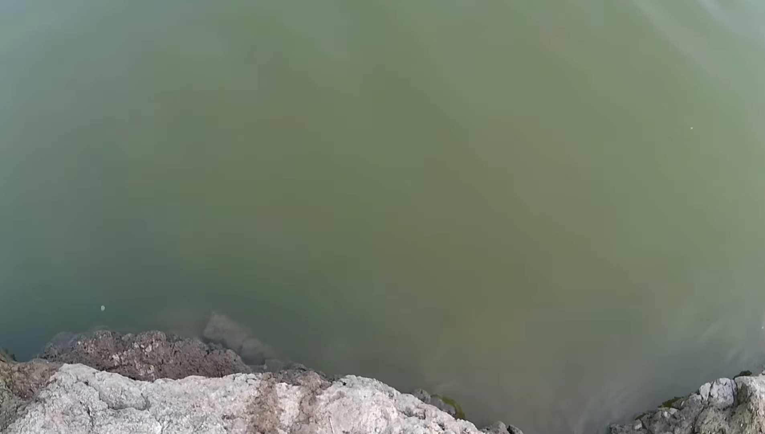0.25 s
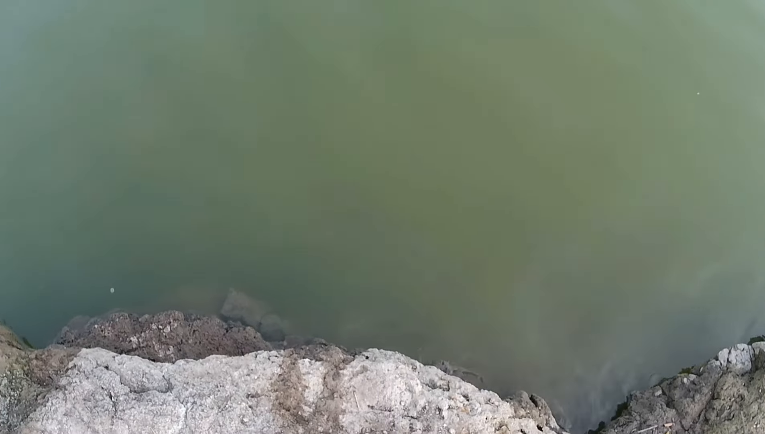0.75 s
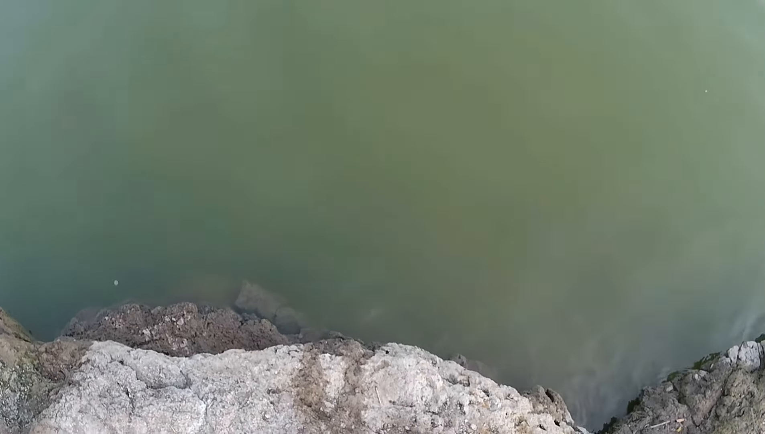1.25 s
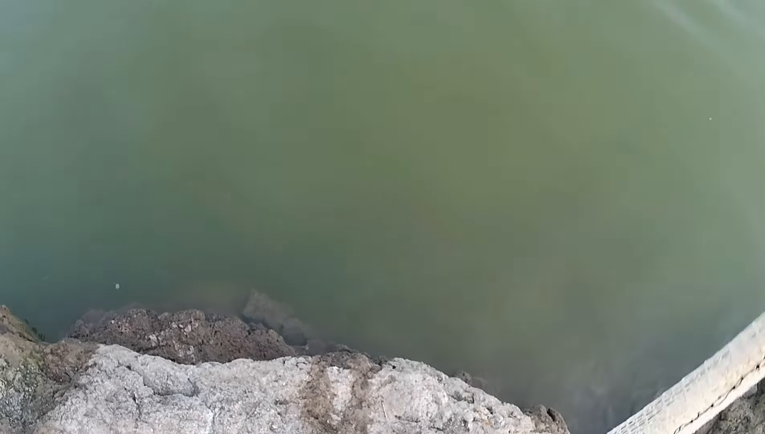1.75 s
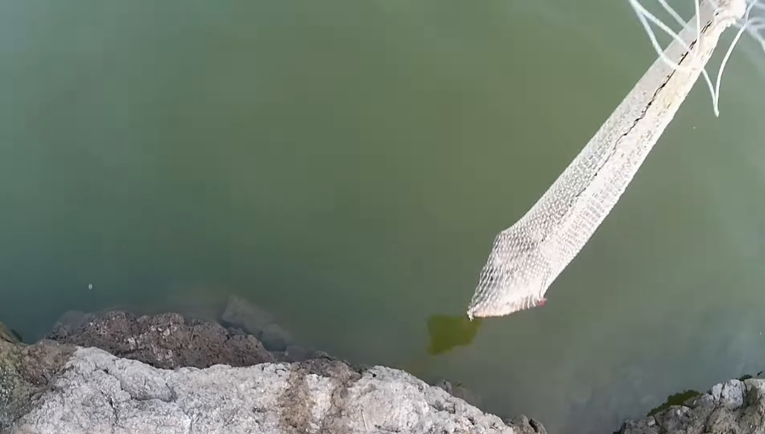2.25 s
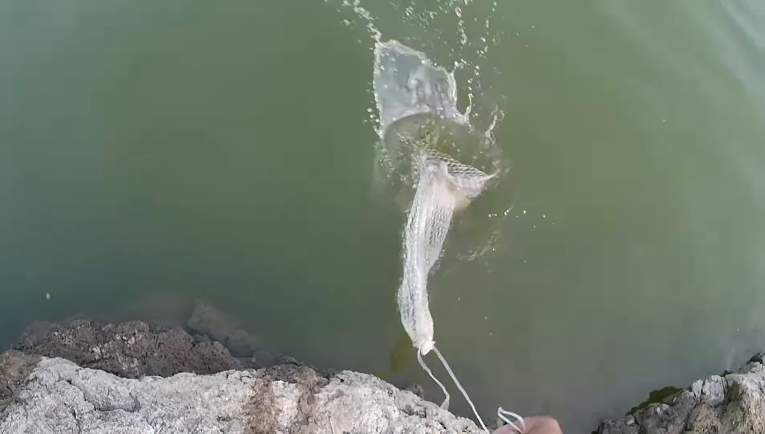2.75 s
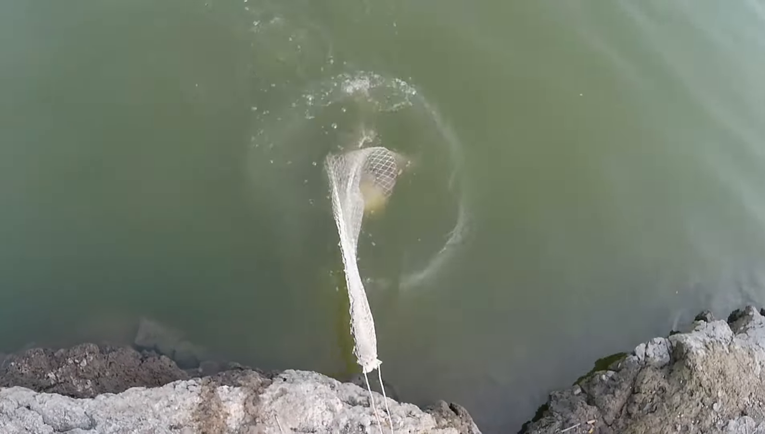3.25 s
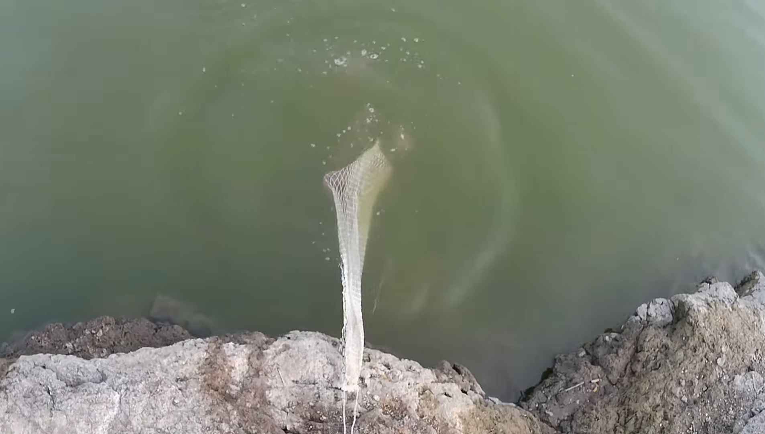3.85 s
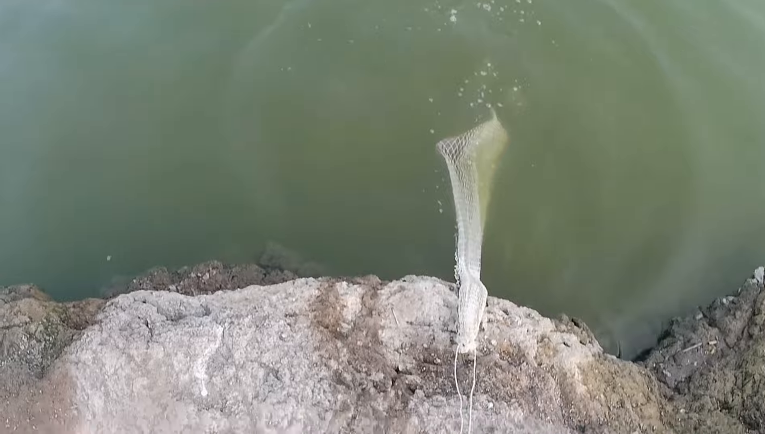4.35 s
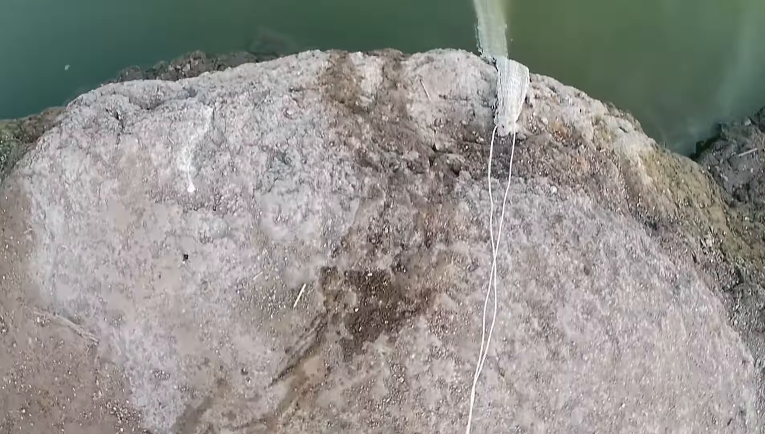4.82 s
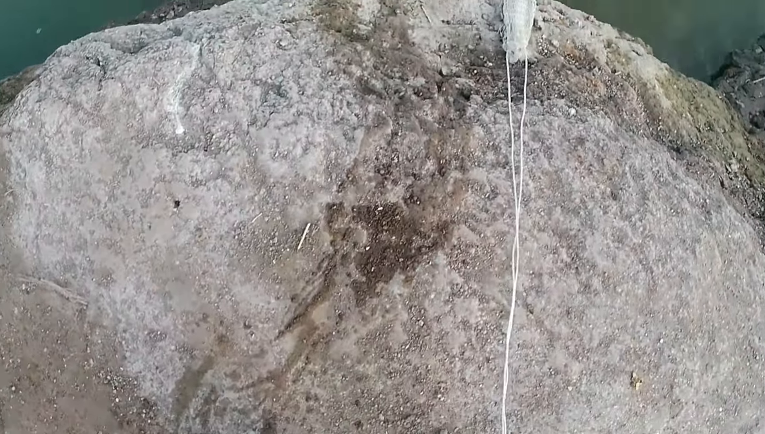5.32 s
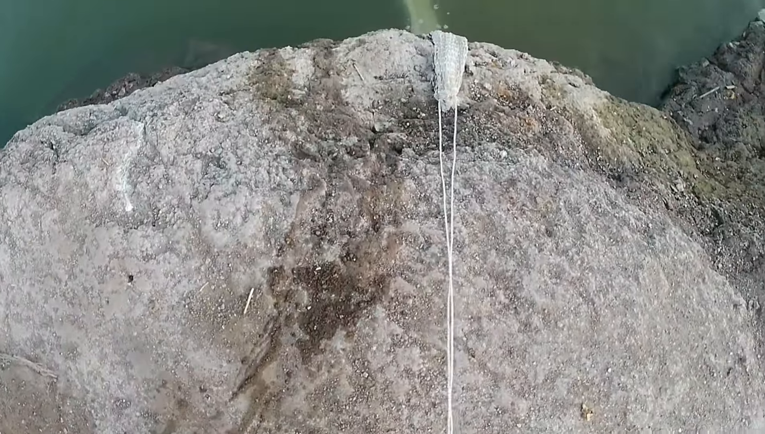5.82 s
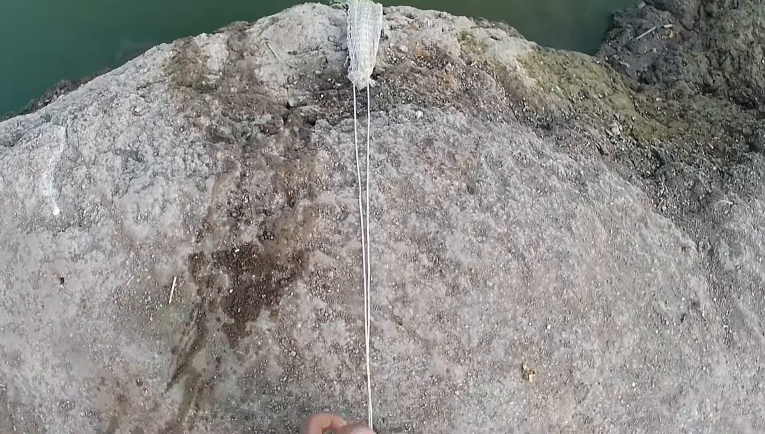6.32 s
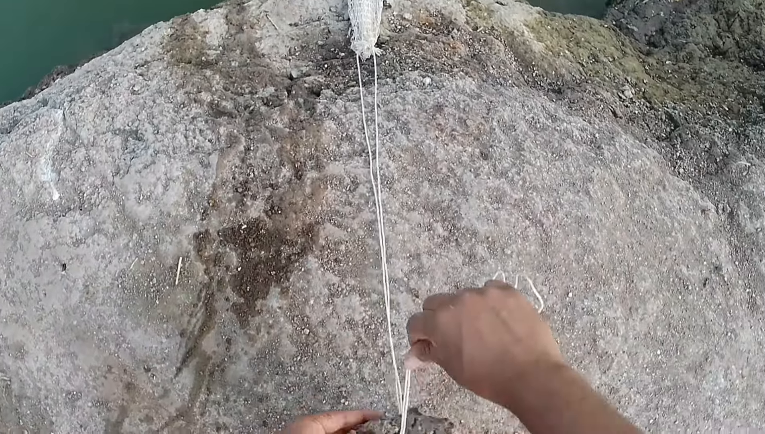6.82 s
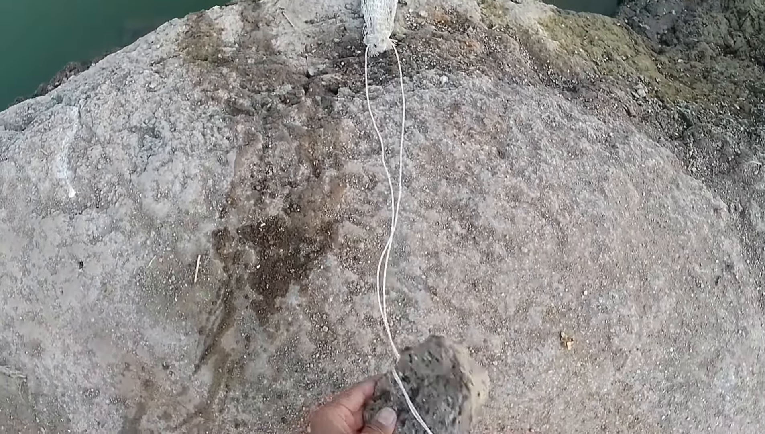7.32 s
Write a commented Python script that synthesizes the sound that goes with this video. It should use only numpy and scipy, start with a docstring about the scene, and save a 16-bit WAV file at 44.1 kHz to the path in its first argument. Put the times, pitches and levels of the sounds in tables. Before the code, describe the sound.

Outdoors on a rock by a pond, gusts buffet the microphone while far birds whistle faintly and the mount ticks. A thrown net lands with a sharp splash, then spatters and gurgles for a moment. Short foot scuffs, a small slosh and more sharp clicks follow. Two dull, close knocks of a stone come last, as the wind and a far roar carry on.

```python
"""On a rock by a pond, a mesh net is thrown and its cord is wound round a stone.
A small camera in a case hears it: wind buffets the microphone over a far roar and far birds whistle.
The camera mount ticks as the head turns, feet scuff, water sloshes, the cord ticks and the stone bumps.
The net slaps the water: spray patters, droplets crack on the surface and trapped air rings as bubbles."""
import sys
import numpy as np
from scipy import signal
from scipy.fft import rfft, irfft
from scipy.io import wavfile
from scipy.ndimage import uniform_filter1d

SR = 44100
rng = np.random.default_rng(int(sys.argv[2]) if len(sys.argv) > 2 else 0)


def file_out(sig):
    """Save sig as 16-bit WAV at sys.argv[1]."""
    # one column per channel
    cols = np.atleast_2d(sig).T
    # limit, then scale
    lim = np.clip(cols, -1, 1)
    pcm = np.round(lim * 32767).astype(np.int16)
    wavfile.write(sys.argv[1], SR, pcm)


N = 333925


def gain_of(db):
    """Turns decibels into a number to multiply a sound by."""
    return 10 ** (np.asarray(db) / 20)


def evened(x):
    """Scales a signal to an average (rms) size of 1."""
    return x / np.sqrt(np.mean(x ** 2) + 1e-20)


def over_time(points):
    """Joins (time, value) points with straight lines across the whole scene."""
    return np.interp(np.arange(N) / SR, *np.transpose(points))


def add(mix, start_s, sound):
    """Mixes a sound in at its start time."""
    part = mix[round(start_s * SR):][:len(sound)]
    part += sound[:len(part)]


def coloured(x, tone):
    """Shapes the lows and highs of x with a tone table; the result has size 1."""
    hz = np.fft.rfftfreq(len(x), 1 / SR)
    tone_hz, tone_db = np.transpose(tone)
    db = np.interp(np.log(hz + 1), np.log(tone_hz + 1), tone_db, left=-90, right=-90)
    return evened(irfft(rfft(x) * gain_of(db), len(x)))


def noise(tone):
    """Steady shaped noise as long as the scene."""
    return coloured(rng.standard_normal(N), tone)


def band(low_hz, high_hz, length, order=4):
    """Up to 0.1 s of noise between two frequencies."""
    edges = signal.butter(order, [low_hz, high_hz], "band", fs=SR, output="sos")
    return evened(signal.sosfilt(edges, rng.standard_normal(SR // 10)))[-length:]


def wobble(samples, length=N):
    """A random drift of about size 1, smoothed over the given number of samples."""
    return evened(uniform_filter1d(uniform_filter1d(rng.standard_normal(N), samples), samples))[:length]


# tone of the microphone's hiss: (frequency [Hz], relative level [dB])
HISS_TONE = [(1470, -10), (2500, -3), (3950, -3.5), (8020, -7), (15000, -10), (16000, -13)]


def hiss():
    """The microphone makes a faint noise of its own."""
    return gain_of(-57.5) * noise(HISS_TONE)


# tone of the background rush: (frequency [Hz], relative level [dB])
RUSH_TONE = [(480, -10.5), (650, -2.5), (980, -18)]
# how the rush grows: (time [s], level [dB])
RUSH_LEVEL = [(4.3, -52), (5.3, -42.5)]


def rush():
    """A narrow band of noise grows louder in the background."""
    return noise(RUSH_TONE) * gain_of(over_time(RUSH_LEVEL))


# far bird calls: (time [s], length [s], four pitches in turn [Hz], level [dB], octave level [dB])
BIRD_CALLS = [(.066, 0.062, 2480, 2450, 2320, 2130, -56, -62),
              (.188, 0.02, 4250, 4450, 4550, 4600, -62, -80),
              (1.34, .052, 3100, 3330, 3180, 3030, -61, -80),
              (1.995, 0.225, 2630, 2510, 2590, 2560, -61, -70),
              (2.33, 0.11, 2600, 2640, 2470, 2310, -57, -75),
              (4.305, 0.205, 2500, 2510, 2500, 2530, -57.5, -85),
              (7.35, 0.021, 3350, 3300, 3280, 3150, -58, -80)]


def bird(length_s, *row):
    """An almost pure whistle with a faint octave above, wavering on its way through the air."""
    *pitches, db, octave_db = row
    t = np.arange(0, length_s, 1 / SR)
    hz = np.interp(t, np.linspace(0, length_s, len(pitches)), pitches)
    phase = 2 * np.pi * np.cumsum(hz * (1 + 0.0093 * wobble(150, len(t)))) / SR
    whistle = np.sqrt(2) * (gain_of(db) * np.sin(phase) + gain_of(octave_db) * np.sin(2 * phase))
    return whistle * gain_of(2.0 * wobble(300, len(t))) * signal.windows.tukey(len(t), .3)


# gusts at the microphone: (time [s], level [dB])
GUSTS = [(0, -25.5), (.65, -30), (1.95, -25), (2.12, -17), (2.4, -23.5), (2.53, -11.5), (2.74, -15),
         (2.82, -21), (3.27, -22.5), (3.4, -15), (3.48, -20.5), (3.62, -15), (3.75, -25.5), (3.98, -12.5),
         (4.38, -26), (6.3, -23), (6.88, -28), (7.57, -22.5)]
# tones of the wind's buffeting and of the far roar: (frequency [Hz], relative level [dB])
BUFFET_TONE = [(4.7, -42), (8.0, -3.5), (49, 2.5), (106, -9), (215, -21.5), (241, -19), (270, -30.5),
               (400, -34.5), (520, -77), (880, -120)]
ROAR_TONE = [(59, -41), (100, -0.5), (216, -6), (249, -4), (304, -7.5), (338, -8), (461, -15), (490, -12.5),
             (755, -19.5), (1400, -31), (4000, -48.5), (5200, -52), (8800, -120)]


def wind():
    """Swirls of air rumble at the microphone opening; a far roar follows the gusts a little."""
    gust_db = over_time(GUSTS)
    buffet = noise(BUFFET_TONE) * gain_of(gust_db + 1.7 * wobble(1500))
    roar = noise(ROAR_TONE) * gain_of(-31 + 0.083 * gust_db + 1.08 * wobble(700))
    return buffet + roar


def jolt(u):
    """A single shove near u = 0: a quick rise and a slower fall."""
    return 0.95 / (np.exp(-np.clip(10.5 * u, -50, 50)) + np.exp(np.minimum(u, 50)))


def cushioned(x, ms):
    """Padding spreads a knock over about ms milliseconds and dulls its highs."""
    cycles_per_ms = np.fft.rfftfreq(len(x), 1000 / SR)
    return irfft(rfft(x) * np.exp(-(cycles_per_ms * ms) ** 3), len(x))


# notes the camera case rings at: (pitch [Hz], relative level [dB], time to fade by 60 dB [s])
CASE_NOTES = [(1030, 2, 0.0024), (1710, -14, 0.016), (2605, -2, 0.0066), (3620, -18, 0.0096),
              (4530, -3, 0.0065), (5220, -8.5, 0.0056), (7300, -36, 0.0041)]


def case_tick(contact_ms, bounce_ms, bounce_share, settle, ring_db, soften):
    """The case is jolted 2 ms in, rings, bounces once more softly and slowly settles."""
    t = np.arange(1500) / SR
    ms = t * 1000
    ring = sum(gain_of(db - 60 * t / fade_s) * np.sin(2 * np.pi * hz * t)
               for hz, db, fade_s in CASE_NOTES)
    out = settle * jolt((ms - 3.5) / 2.0)
    for share, at_ms, span_ms in (1, 2, contact_ms), (bounce_share, 2 + bounce_ms, soften * contact_ms):
        front = jolt((ms - at_ms) / (0.62 * span_ms))  # the steep start sets the case ringing
        ringing = gain_of(ring_db) * np.convolve(front / front.sum(), ring)[:len(t)]
        out += share * (jolt((ms - at_ms) / span_ms) + ringing)
    return out


# the mount slips forward: (time [s], level before padding [dB], bounce delay [ms], padding [ms])
MOUNT_SLIPS = [(0.2713, 0.5, 2.9, 0.21), (.869, -7, 2.5, 0.85), (3.8497, 6, 2.75, 0.12),
               (3.8581, -6.5, 2.1, 0.68), (4.1435, -6.5, 2.7, 0.66), (5.031, -5.5, 1.5, 0.69),
               (5.2325, 1, 1.23, 0.21), (5.7944, -7, 2, 0.66), (5.8724, -2, 3.9, .33),
               (6.0704, -3.5, 2.3, 0.41)]
# the mount snaps back:
# (time [s], level before padding [dB], bounce delay [ms], bounce size [share], padding [ms])
MOUNT_SNAPS = [(.908, -5.5, 8.5, 0.41, 0.12), (0.9236, -16.5, 8.1, .05, 0.41),
               (5.1506, -7.5, 9.3, 0.21, 0.13), (5.364, -2.5, 8.5, 0.088, 0.08),
               (6.0158, -5.5, 1.76, 0.16, 0.18)]


def mount():
    """As the head turns, the mount gives the case blunt pushes and sharp pulls."""
    out = np.zeros(N)
    push_ms, pull_ms, lead_s = 0.72, 0.27, 0.002
    for s, db, bounce_ms, padding_ms in MOUNT_SLIPS:
        push = case_tick(push_ms, bounce_ms, bounce_share=0.16, settle=0.15, ring_db=-21.5, soften=1.1)
        add(out, s - lead_s, gain_of(db) * cushioned(push, padding_ms))
    for s, db, bounce_ms, bounce_share, padding_ms in MOUNT_SNAPS:
        pull = case_tick(pull_ms, bounce_ms, bounce_share, settle=0.37, ring_db=3.5, soften=1.8)
        add(out, s - lead_s, -gain_of(db) * cushioned(pull, padding_ms))
    return out


# short gritty noise bursts, foot scuffs and (near 4.5 s) a slosh of water:
# (time [s], crunch level [dB], length [s], crunch pitch [Hz], grit level [dB])
SCUFFS_AND_SLOSH = [(0, -29.5, 0.038, 1100, -47), (.036, -23, 0.011, 1150, -43.5),
                    (.049, -33, 0.017, 1120, -49), (3.365, -41, 0.056, 1190, -64),
                    (3.396, -31, 0.0093, 1110, -49), (3.406, -38, 0.028, 1200, -54),
                    (3.58, -33.5, 0.044, 1200, -48), (3.596, -32, 0.015, 1130, -48),
                    (3.66, -30, 0.0081, 930, -57), (4.465, -23.5, 0.005, 760, -50),
                    (4.487, -34.5, 0.06, 1070, -57)]


def gritty_burst(crunch_db, length_s, hz, grit_db):
    """A scuff or slosh is a short noise: a dull crunch, a harder gritty band and a thin rasp on top."""
    length = round(length_s * SR)
    crunch = gain_of(crunch_db) * band(hz * 0.45, hz * 1.226, length, order=3)
    grit = gain_of(grit_db) * band(1800, 2550, length, order=3)
    rasp = gain_of(grit_db - 8) * band(3200, 6300, length)
    return (crunch + grit + rasp) * signal.windows.tukey(length, .5)


# the net's cord ticks: (time [s], level [dB])
CORD_TICKS = [(6.643, -47)]


def cord(db, length_s=0.0089):
    """The cord gives a brief, dry, high tick."""
    length = round(length_s * SR)
    return gain_of(db) * band(3500, 6400, length) * signal.windows.tukey(length, .7)


# stone bumps: (time [s], level [dB], pitch [Hz], time to fade by 60 dB [s], sway level [dB])
STONE_BUMPS = [(6.1703, 6.8, 236.4, .021, -5), (7.5546, 10, 255, .013, 0)]


def stone(db, hz, fade_s, sway_db):
    """The stone bumps near the camera: a short knock and a deep sway come through the case."""
    t = np.arange(4000) / SR
    ring = np.sin(2 * np.pi * hz * t) + 0.071 * np.sin(2 * np.pi * 1230 * t)
    knock = gain_of(db - 60 * t / fade_s) * ring * np.tanh((t / 0.0012) ** 2)
    low_note = np.sin(2 * np.pi * 75 * (t - .007))
    sway = gain_of(sway_db - 60 * t / 0.063) * low_note * np.tanh((t / 0.002) ** 2)
    return -knock - sway


# bubbles in the pond: (time [s], level [dB], starting pitch [Hz], time to fade by 60 dB [s])
POND_BUBBLES = [(.071, -31, 1350, 0.033), (1.375, -35.5, 1110, .05), (2.524, -4, 973, 0.015),
                (2.572, -20, 1210, 0.023), (2.625, -19.5, 920, 0.032), (2.672, -25.5, 1104, 0.11),
                (2.697, -11, 880, 0.047), (2.804, -23, 4300, 0.016), (2.81, -25, 1650, 0.031),
                (2.912, -33, 3300, 0.04), (2.968, -22.5, 924, 0.11), (2.984, -21, 435, 0.33),
                (3.058, -11, 835, 0.022), (3.1, -30.5, 720, 0.13), (3.134, -29.5, 842, 0.18),
                (4.014, -25, 830, 0.029), (4.5, -13, 1040, 0.011), (4.519, -25, 1240, 0.013),
                (4.526, -16, 1480, 0.016), (4.5395, -3.5, 475, 0.009), (4.709, -21.5, 970, 0.033)]


def bubble(db, hz, fade_s, octaves_per_s=3.3):
    """Trapped air rings unevenly and rises in pitch as it nears the surface."""
    t = np.arange(0, min(fade_s, 1.5 / max(octaves_per_s, 1)), 1 / SR)
    pitch = hz * 2 ** (octaves_per_s * t) * (1 + 0.083 * wobble(90, len(t)))
    soft_ends = np.tanh(t / 0.0019) * np.tanh((t[-1] - t) / .003)
    return gain_of(db - 60 * t / fade_s) * np.sin(2 * np.pi * np.cumsum(pitch) / SR) * soft_ends


# single falling drops: (time [s], level [dB], starting pitch [Hz], pitch rise [octaves/s])
WATER_DROPS = [(3.705, -36, 940, 29), (4.63, -32, 780, 49)]


def drop(db, hz, octaves_per_s):
    """The air pocket under a fallen drop closes fast, so its note sweeps quickly up."""
    return bubble(db, hz, fade_s=0.07, octaves_per_s=octaves_per_s)


# larger droplets landing: (time [s], level [dB], lowest frequency [Hz], highest frequency [Hz])
DROPLET_CRACKS = [(2.523, -33, 3500, 6030), (2.556, -36, 4200, 6200), (2.572, -48, 4000, 12000),
                  (2.695, -43, 2600, 6000), (2.736, -50, 4500, 8000), (2.78, -42, 3600, 5600),
                  (2.935, -41, 4000, 5800), (2.9405, -26, 447, 1340), (2.96, -49, 6500, 9500),
                  (2.984, -44, 3000, 9000), (3.075, -40, 3180, 4770)]


def crack(db, low_hz, high_hz, decay_s=0.0044):
    """A droplet hits the surface with a puff of noise that dies at once."""
    t = np.arange(0, 3 * decay_s, 1 / SR)
    return gain_of(db) * band(low_hz, high_hz, len(t)) * np.exp(-t / decay_s) * np.tanh(t / 0.00065)


def pings(length, low_hz, high_hz, cycles, spread_db, glide, per_s=2500, pitches=24):
    """Many tiny ringing notes at random moments, a few of them loud."""
    out = np.zeros(length)
    for hz in np.geomspace(low_hz, high_hz, pitches):
        turns = np.arange(0, 3 * cycles, hz / SR)
        fade = np.exp(-turns / cycles) * np.tanh(turns)
        ring = np.sin(2 * np.pi * turns * (1 + glide * turns)) * fade
        sizes = gain_of(spread_db * np.minimum(rng.exponential(1, length), 4))
        hits = rng.random(length) < per_s / pitches / SR
        out += signal.oaconvolve(sizes * hits, ring / np.linalg.norm(ring))[:length]
    return evened(out)


# the net lands and drains: (time [s], patter level [dB], gurgle level [dB])
NET_SPLASH = [(2.519, -41, -54), (2.524, -28.5, -23), (2.54, -37.5, -31), (2.58, -41.5, -34.5),
              (2.63, -49, -43.5), (2.7, -41, -33), (2.83, -55.5, -52.5), (2.865, -48.5, -49),
              (2.935, -50, -47), (2.945, -48, -32.5), (3.06, -51.5, -46.5), (3.15, -70, -52)]
# tones of the pattering spray and the gurgling air pockets: (frequency [Hz], relative level [dB])
SPRAY_TONE = [(1350, -38), (2200, -3), (2890, -7), (3500, 0), (4210, 1.5), (5400, 5), (5800, 1.5),
              (6300, -9.5), (8500, -9.5), (12200, -10.5), (13000, -35)]
POCKET_TONE = [(450, -24), (800, 0), (1150, 1.5), (1400, -9.5), (1800, -4.5), (2300, -10)]


def net_splash():
    """The net slaps the pond: droplets patter in clumps over a fine hiss, air pockets gurgle below."""
    times, patter_db, gurgle_db = np.transpose(NET_SPLASH)
    t = np.arange(times[0], times[-1], 1 / SR)
    droplets = pings(len(t), 2300, 7000, cycles=8, spread_db=3.6, glide=.002)
    spray = coloured(droplets + 0.9 * rng.standard_normal(len(t)), SPRAY_TONE)
    patter = spray * gain_of(np.interp(t, times, patter_db) + 1.9 * wobble(150, len(t)))
    pockets = pings(len(t), 607, 1800, cycles=2.6, spread_db=6.0, glide=0.013)
    gurgle = coloured(pockets, POCKET_TONE) * gain_of(np.interp(t, times, gurgle_db))
    out = np.zeros(N)
    add(out, times[0], patter + gurgle)
    return out


def scene():
    """All the sounds meet at one microphone."""
    out = hiss() + rush() + wind() + mount() + net_splash()
    for table, source in ((BIRD_CALLS, bird), (SCUFFS_AND_SLOSH, gritty_burst), (CORD_TICKS, cord),
                          (STONE_BUMPS, stone), (POND_BUBBLES, bubble), (WATER_DROPS, drop),
                          (DROPLET_CRACKS, crack)):
        for start_s, *row in table:
            add(out, start_s, source(*row))
    return out[None]


def record(dry, sharpness=14, top_hz=15850):
    """The hardest knocks overload the camera and are rounded off; then the very top highs are cut."""
    rounded = dry / (1 + abs(dry) ** sharpness) ** (1 / sharpness)
    high_cut = signal.firwin(511, top_hz, window=("kaiser", 9), fs=SR)[None]
    padded = np.pad(rounded, ((0, 0), (255, 255)), "edge")
    return signal.oaconvolve(padded, high_cut, "valid")


dry = scene()
out = record(dry)
file_out(out)
```